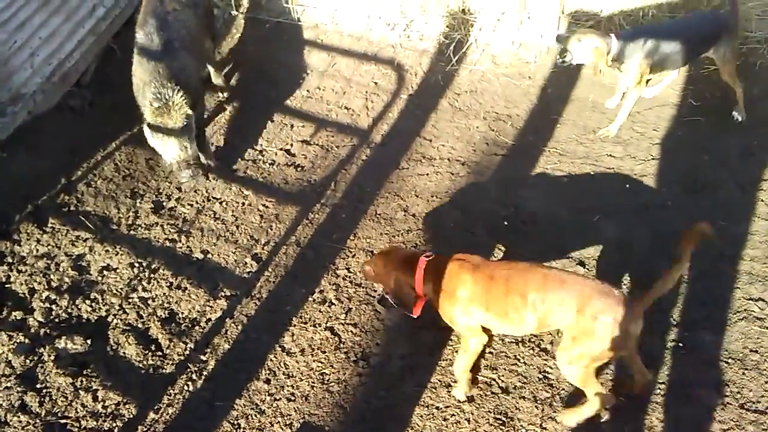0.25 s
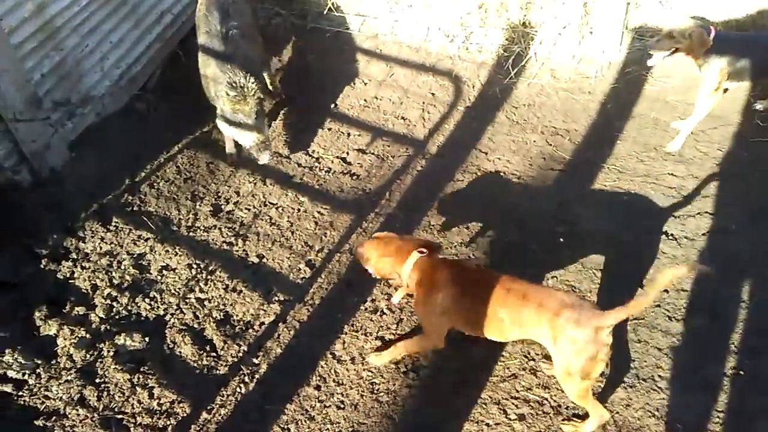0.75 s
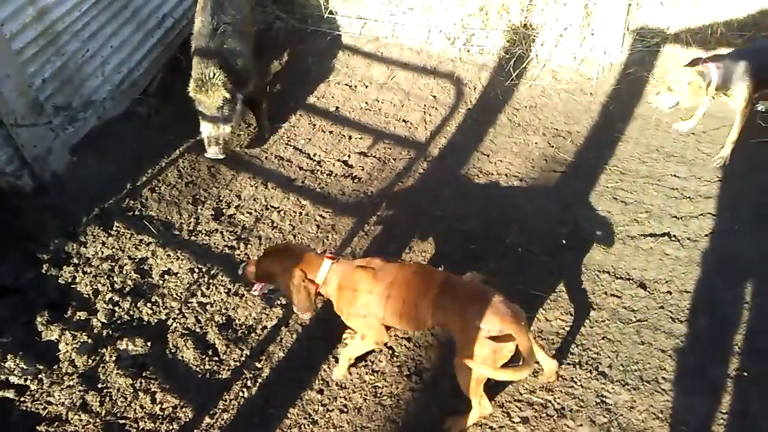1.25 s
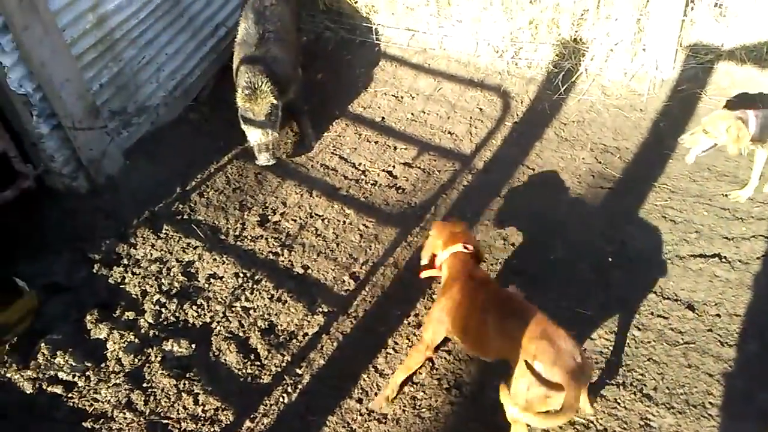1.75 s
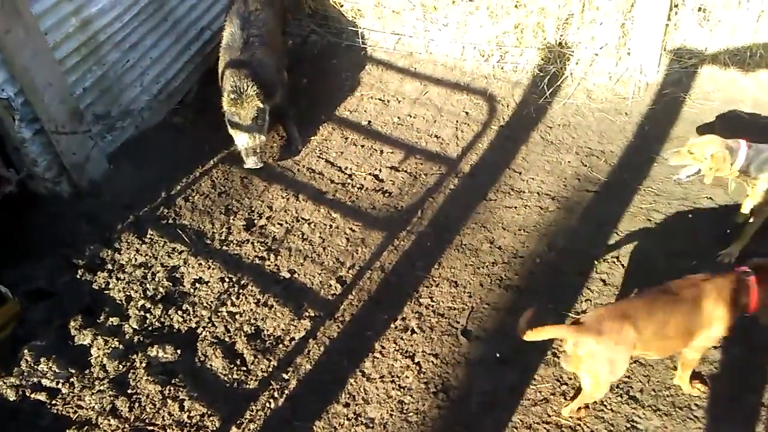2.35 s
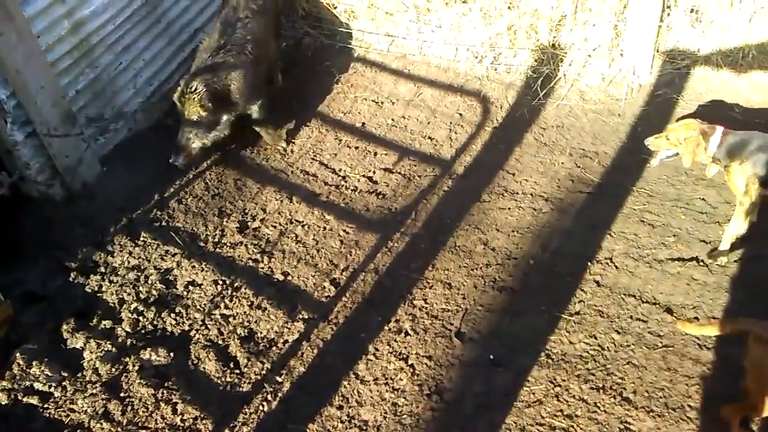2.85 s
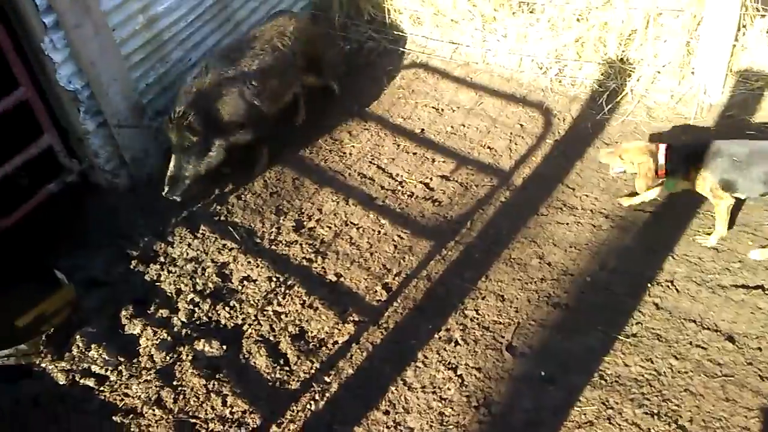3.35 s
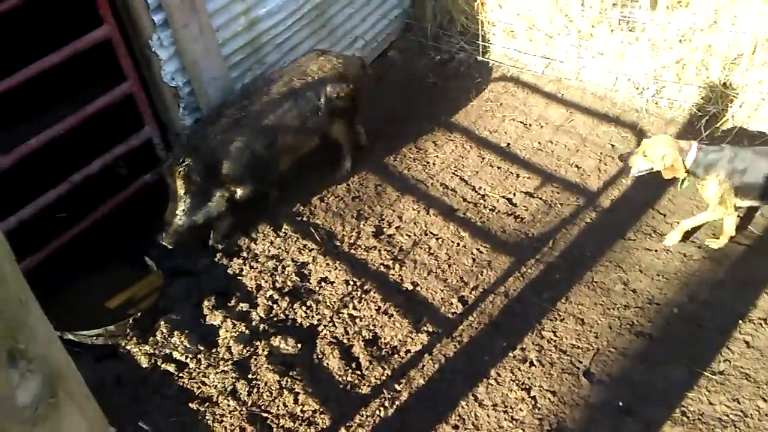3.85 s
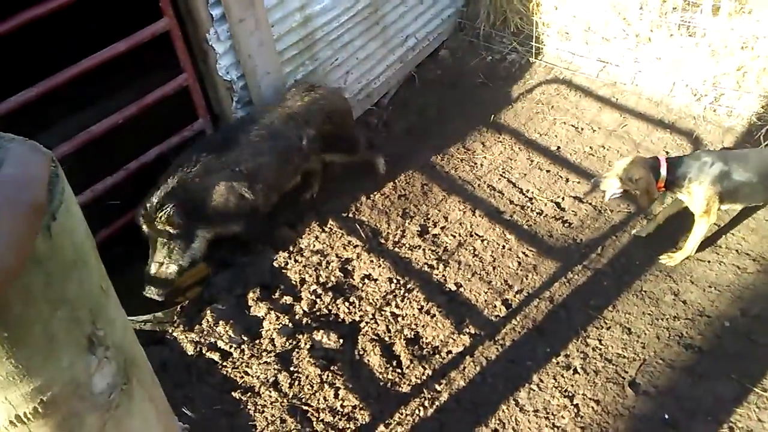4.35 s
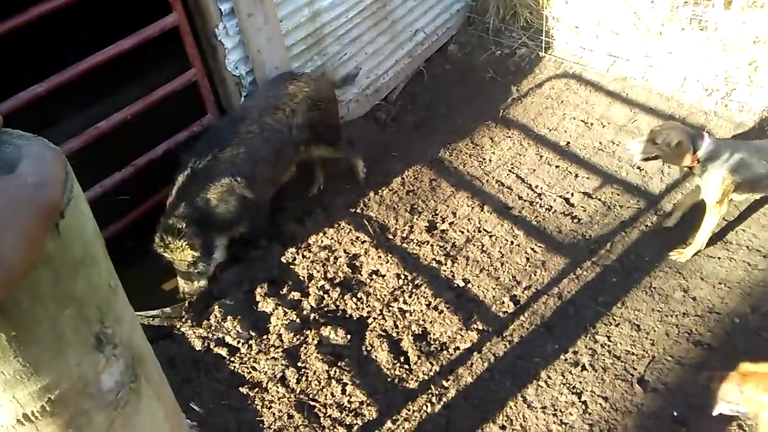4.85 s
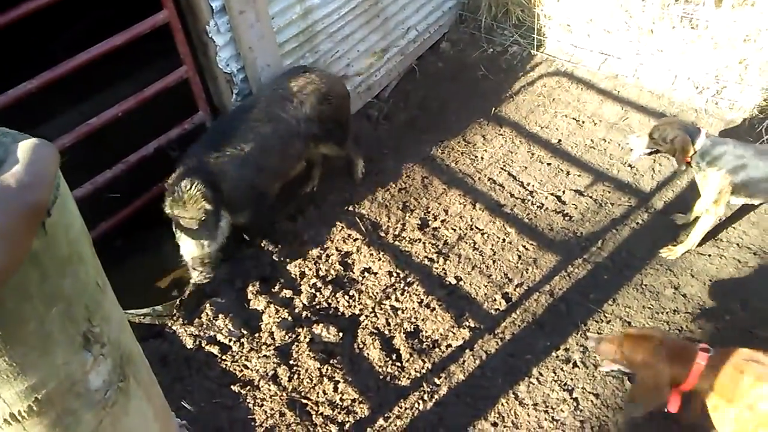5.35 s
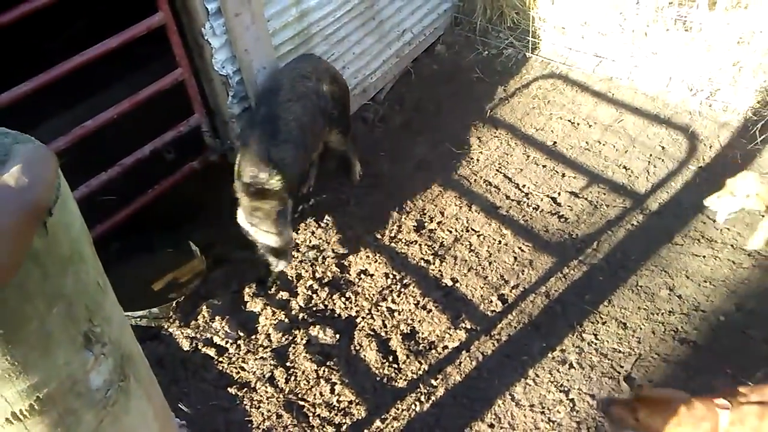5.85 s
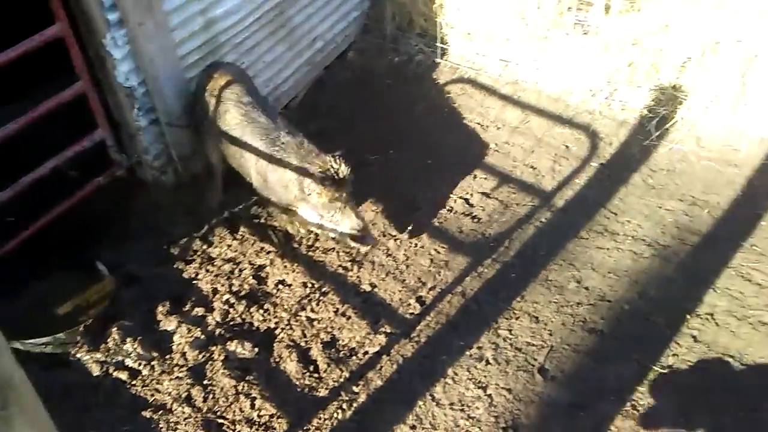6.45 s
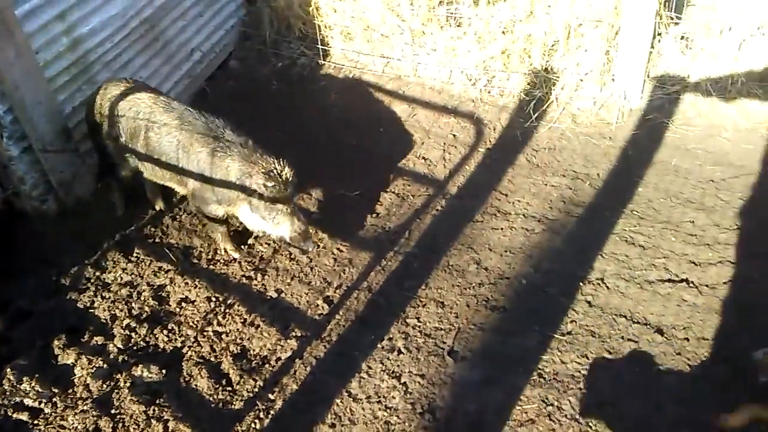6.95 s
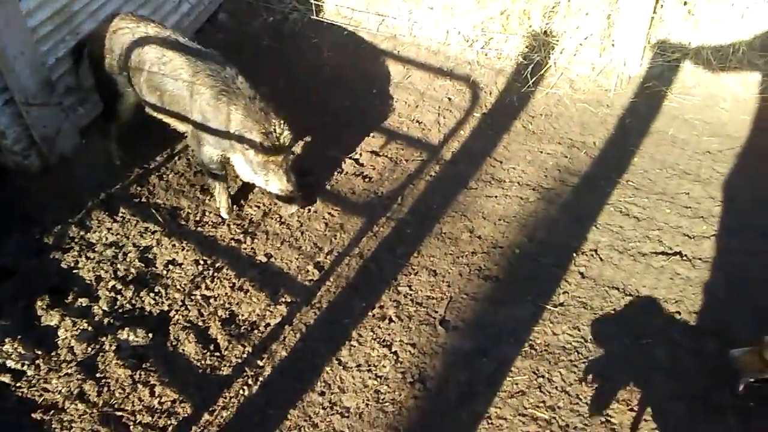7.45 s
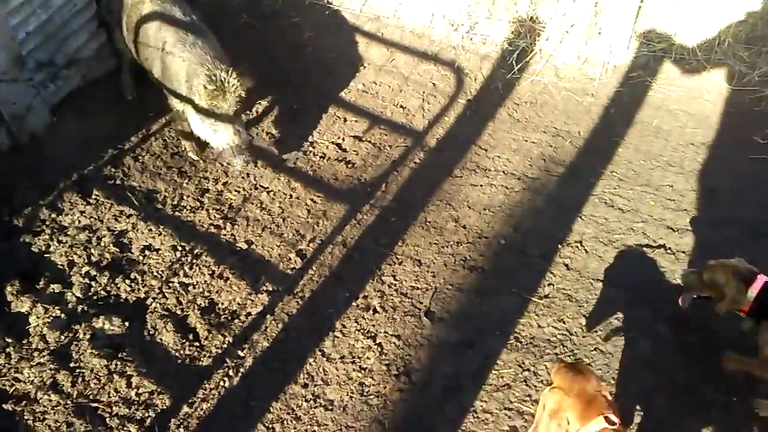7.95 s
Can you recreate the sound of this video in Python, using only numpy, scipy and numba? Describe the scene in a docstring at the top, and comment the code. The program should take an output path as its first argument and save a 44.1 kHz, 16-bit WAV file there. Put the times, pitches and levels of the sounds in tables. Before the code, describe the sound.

Two young hounds bark and bay in quick succession in a metal-walled dirt pen, with sharp rising whistle-like yips piercing through very close by.

```python
"""Young dogs baying in a metal-walled pen

Two dogs, one hoarse and one clear, bark a few metres away; their voices are wavering partials plus throaty rasp.
Others answer far off and an animal grunts. Close by, sharp near-sine whistles rise and turn breathy.
Behind them noise makes the shuffling paws, wind, hiss and airy whines; short filtered clicks make the knocks.
The walls echo, and the loudest sounds pull the gain down and clip."""
import sys
import numpy as np
from scipy import signal
from scipy.io import wavfile
from scipy.ndimage import uniform_filter1d, minimum_filter1d
from numba import njit

SR = 44100
rng = np.random.default_rng(int(sys.argv[2]) if len(sys.argv) > 2 else 0)


def master_out(mix):
    """Clip the mix to full scale and print it as 16-bit PCM to the path in sys.argv[1]."""
    frames = np.transpose(np.atleast_2d(mix))
    ceiling = np.clip(frames, -1, 1)
    pcm = np.round(ceiling * 32767).astype(np.int16)
    wavfile.write(sys.argv[1], SR, pcm)


N = 362497


def undb(db):
    """Turn decibels into a plain amplitude factor."""
    return 10 ** (np.asarray(db) / 20)


def unit(x):
    """Scale a sound so its average power is 1."""
    return x / np.sqrt(np.mean(x ** 2))


def noise(n):
    """White noise: equal strength at every pitch."""
    return rng.standard_normal(n)


def band(x, hz, width_hz):
    """Two-pole resonance, gain 1 at the centre."""
    b, a = signal.iirpeak(hz, hz / width_hz, SR)
    return signal.lfilter(b, a, x)


def walk(n, rate):
    """Random levels held for 1 / rate seconds, then smoothed twice so they glide."""
    hold = max(int(SR / rate), 40)
    steps = np.repeat(noise(n // hold + 1), hold)
    smooth = uniform_filter1d(uniform_filter1d(steps, hold), hold)
    return 1.3 * smooth[:n]


def read(rows):
    """Give the first sample, a short fade at both ends, and each column sample by sample."""
    s, *columns = np.transpose(rows)
    start = int(s[0] * SR)
    t = np.arange(start, min(int(s[-1] * SR), N)) / SR
    fade = np.clip(np.minimum(t - s[0], s[-1] - t) / 0.0022, 0, 1)
    return start, fade, [np.interp(t, s, c) for c in columns]


# a faint high hiss that swells now and then: t/s, level/dB
HISS_LEVELS = [(0.0, -58), (0.36, -61), (2.98, -65.5), (3.82, -64), (4.21, -59), (6.55, -57), (6.68, -55),
               (7.51, -55), (7.76, -46), (8.22, -57)]


def hiss():
    """Thin flickering noise high up, made by passing noise twice through one wide resonance."""
    db = read(HISS_LEVELS)[2][0]
    thin = band(band(noise(len(db)), 7800, 5400), 7800, 5400)
    return undb(db + 1.5 * walk(len(db), 30)) * unit(thin)


# thin airy whines in the background: start t/s, length t/s, centre f/Hz, top level/dB
AIRY_WHINES = [(1.267, 0.19, 3380, -34.5), (1.293, 0.21, 4200, -41), (2.2, .25, 2800, -49),
               (3.663, .06, 2700, -34), (4.551, .11, 2620, -33), (8.016, 0.14, 3390, -30.5)]
WHINE_ATTACK, WHINE_EDGE_DB = 0.37, 13  # share of the length spent swelling; how far the ends lie under the top


def whines():
    """Narrow noise that swells and fades: a steady sine shaken by a fast random walk."""
    out = np.zeros(N)
    for s, length, centre_hz, top_db in AIRY_WHINES:
        edge_db = top_db - WHINE_EDGE_DB
        start, fade, (hz, db) = read([(s, centre_hz, edge_db),
                                      (s + WHINE_ATTACK * length, centre_hz, top_db),
                                      (s + length, centre_hz, edge_db)])
        sine = np.sin(2 * np.pi * np.cumsum(hz) / SR)
        out[start:start + len(hz)] += fade * undb(db) * walk(len(hz), 900) * sine
    return out


# gusts on the microphone port, before flutter: t/s, level/dB
GUSTS = [(0.0, -71), (0.2, -34), (0.25, -50.5), (1.24, -38.5), (2.06, -57), (2.15, -38.5), (2.36, -62),
         (2.4, -36), (2.79, -66.5), (3.09, -47.5), (4.03, -40.5), (5.79, -43.5), (5.81, -46), (7.14, -45),
         (7.39, -59), (7.51, -36), (7.67, -50), (8.22, -44)]


def wind():
    """Low buffeting on the microphone port: deep noise with a slow and a faster flutter."""
    db = read(GUSTS)[2][0]
    rumble = band(band(noise(len(db)), 65, 90), 65, 150)
    flutter_db = 3 * walk(len(db), 15) + 4 * walk(len(db), 5)
    return undb(db + flutter_db) * unit(rumble)


# paws and bodies moving in the dirt: t/s, level/dB
PAW_LEVELS = [(0.0, -31), (0.43, -34.5), (0.68, -41), (1.3, -35), (1.74, -44), (2.31, -50), (2.65, -35),
              (2.86, -45), (3.23, -43), (3.65, -34), (3.89, -43), (4.4, -32), (5.01, -37), (5.43, -43),
              (5.72, -38.5), (6.68, -30), (7.6, -40), (8.22, -37)]
# tone colour of the dirt rustle, relative: f/Hz, level/dB per Hz
DIRT_COLOUR = [(88, -59), (150, -0.5), (562, -10), (623, -9), (680, -3.5), (1370, -4.5), (3270, -19),
               (5000, -57), (6500, -78), (11000, -120)]


def shuffle():
    """Half-octave bands of dirt rustle and yard murmur, each flickering on its own."""
    colour_hz, colour_db = np.transpose(DIRT_COLOUR)
    bands = np.zeros(N)
    for f in 170 * 2 ** np.arange(0, 5.1, .5):
        db = np.interp(np.log(f), np.log(colour_hz), colour_db) + 5.7 * walk(N, 9)
        bands += undb(db) * band(band(noise(N), f, f / 2), f, f / 2)
    level_db = read(PAW_LEVELS)[2][0]
    return undb(level_db) * unit(bands[:len(level_db)])


# dry knocks and ticks in the pen: t/s, level/dB before the ring dies away, f/Hz
KNOCK_HITS = [(1.886, -23.5, 2500), (4.49, -12, 900), (4.6, -33.5, 5870), (5.37, -30, 950),
              (6.308, -21, 1140), (7.429, -35, 1080), (8.0027, -36, 7100), (8.017, -43, 8360),
              (8.0411, -36, 8900), (8.132, -35, 7400)]


def knocks():
    """A click with a short ring: resonant noise that dies away within milliseconds."""
    out, t = np.zeros(N), np.arange(int(.04 * SR)) / SR
    for s, db, hz in KNOCK_HITS:
        start = int(s * SR)
        ring = unit(band(band(noise(len(t)), hz, 0.24 * hz), hz, 2.9 * hz))
        out[start:start + len(t)] += undb(db) * np.exp(-t / 0.003) * ring
    return out


# first reflections from ground and sheet-metal walls close to the dogs: delay t/s, level/dB
REFLECTIONS = [(.004, -23.5), (.011, -12), (.019, -14), (.031, -16), (.047, -21.5), (.068, -15.5)]


def early(x):
    """The direct sound plus delayed, weaker copies: its first reflections."""
    out = x.copy()
    for s, db in REFLECTIONS:
        lag = int(s * SR)
        out += undb(db) * np.r_[np.zeros(lag), x[:N - lag]]
    return out


@njit
def walls(x, lags, gain, damp):
    """Eight delay lines that feed each other, duller on every round."""
    line, soft, out = np.zeros((8, 8192)), np.zeros(8), np.zeros(len(x))
    for i in range(len(x)):
        total = 0.
        for k in range(8):
            soft[k] += (1 - damp) * (gain[k] * line[k, (i - lags[k]) & 8191] - soft[k])
            total += soft[k]
        out[i] = total
        for k in range(8):
            line[k, i & 8191] = x[i] + soft[k] - total / 4
    return out


PEN_T60_S, PEN_DAMP, PEN_DB = 1.1, 0.36, -34  # time to fall 60 dB before damping; treble damping; level


def pen_echoes(x):
    """Sound bounces between the pen walls and dies away."""
    lags = np.array([709, 947, 1213, 1499, 1811, 2143, 2503, 2897])  # samples
    gain = undb(-60 * lags / SR / PEN_T60_S)
    return undb(PEN_DB) * walls(x + 1e-18, lags, gain, PEN_DAMP)


ECHO_S, ECHO_DB = 0.23, -30


def distant_echo(x):
    """A distant wall sends each call back once, dull."""
    lag = int(ECHO_S * SR)
    late = np.r_[np.zeros(lag), x[:-lag]]
    return undb(ECHO_DB) * band(band(late, 1500, 1600), 1200, 2400)


def arches(table, mouth, count, swell_db, ease, odd_db, first_db, early_share, closing_db, clear_db):
    """Each call climbs, holds and falls in pitch; the mouth colours its partials.
    Odd partials and rasp shift in level during the hold; the fundamental starts early and lasts longest."""
    calls, (mouth_hz, mouth_db) = [], np.transpose(mouth)
    for s, rise, hold, fall, hz0, hz1, hz2, hz3, db1, db2, db3, rasp_db, *own in table:
        bend, third_db, fourth_db = own or (1, 0, 0)
        corners = np.cumsum([0, max(rise, .004), max(hold, .002), max(fall, .002)])
        t = np.arange(0, corners[-1], .001)
        up = np.minimum(t / corners[1], 1)
        climb_hz = hz0 * (hz1 / hz0) ** up ** max(bend, .5)
        hz = np.where(up < 1, climb_hz, np.interp(t, corners[1:], [hz1, hz2, hz3]))
        hz = uniform_filter1d(hz, size=9, mode="nearest")
        swell = swell_db * (1 - up) ** max(ease, .5)
        db = np.interp(t, corners[1:], [db1, db2, db3]) - swell
        held = np.interp(t, corners, [0, 1, 1, 0]) ** 3
        # as the mouth closes, higher partials change more
        closing = closing_db * np.interp(t, corners[2:], [0, 1])
        source_db = [(odd_db + first_db) * held + early_share * swell,
                     closing,
                     odd_db * held + third_db + 2 * closing,
                     fourth_db + 3 * closing]
        partials = []
        for k in range(count):
            colour_db = np.interp(np.log((k + 1) * hz), np.log(mouth_hz), mouth_db)
            partials.append(db + source_db[k] + colour_db)
        air_db = db + rasp_db + clear_db * held
        calls.append(np.transpose([s + t, hz, *partials, air_db]))
    return calls


# resonances of the throat: f/Hz, width f/Hz, level/dB
THROAT_RESONANCES = [(633, 357, 6.5), (900, 734, 3), (1650, 510, 7), (2084, 340, 4.5), (2880, 650, -16.5),
                     (4560, 3430, -17)]


def voices(calls, count, jitter, shimmer_db, gate, rasp_db, bright_db):
    """Vocal folds give wavering partials; turbulent air puffs unevenly once a cycle through the throat."""
    out = np.zeros(N)
    for rows in calls:
        start, fade, (hz, *db, air_db) = read(rows)
        n = len(hz)
        # the more turbulent the air, the more it shakes the folds
        rough = np.clip((air_db - np.max(db, axis=0) + 23) / 12, .2, 1.5)
        cycle = np.cumsum(hz * (1 + jitter * rough * walk(n, 120))) / SR
        tone = np.zeros(n)
        for k in range(count):
            level = undb(db[k] + shimmer_db * rough * walk(n, 107.3))
            tone += level * np.sqrt(2) * np.sin(2 * np.pi * (k + 1) * cycle)
        # every second partial above the last listed one, falling away from it
        for k in range(1, 5):
            tone += undb(db[-1] - 10.0 * k) * np.sin(2 * np.pi * (count + 2 * k) * cycle)
        size = undb(4.9 * noise(n))[cycle.astype(int)]  # one random size per cycle
        puffs = size * np.exp(-(cycle % 1) / gate) * noise(n)
        rasp = np.zeros(n)
        for k, (f, width, g) in enumerate(THROAT_RESONANCES):
            rasp += (-1) ** k * undb(g) * band(band(puffs, f, width), f, 2 * width)
        # bright broadband crackle in bursts over the rasp, as from overloaded loud barks
        bright = np.diff(puffs * size, prepend=0) * undb(5 * walk(n, 60))
        rough_part = unit(rasp) + undb(bright_db) * unit(bright)
        out[start:start + n] += fade * (tone + undb(air_db + rasp_db) * rough_part)
    return out


# far barks: start t/s, rise t/s, hold t/s, fall t/s, then f/Hz at start, top, end of hold, end,
# then level/dB at top, end of hold, end (before the mouth's colour), rasp level/dB relative to these
FAR_CALLS = [ (1.01, 0.015, 0.043, 0.065, 560, 582, 611, 620, -28.5, -32, -48, -11),
             (2.09, 0.043, 0.041, .05, 513, 589.3, 597, 606, -28, -30, -54.5, -13.5),
             (4.33, .028, 0.022, 0.1, 714, 700, 689, 742, -34, -26.5, -47, -14.5),
             (5.09, 0.072, 0.049, 0.039, 415, 604.5, 598, 600, -29.5, -33.5, -50, -12.5),
             (5.93, 0.032, 0.0091, 0.035, 569, 601, 584, 556, -36, -32, -46, -18),
             (7.41, .056, 0.045, 0.039, 622, 618, 520, 554, -28, -37, -40, -19),
             (7.78, 0.05, 0.0046, 0.031, 605, 674, 675, 680, -30.5, -34, -55, -20),
             (8.06, 0.072, 0.0075, 0.067, 554, 614, 626, 640, -23.5, -31.5, -60, -6)]
# how the far mouths colour the partials: f/Hz, level/dB
FAR_COLOUR = [(400, -6), (600, -1.5), (1200, -3), (1800, -6.5), (2200, -21)]


def far_barks():
    """Other dogs answer far off: the same kind of voice, with three listed partials."""
    calls = arches(FAR_CALLS, FAR_COLOUR, count=3, swell_db=23, ease=0.91, odd_db=-.1, first_db=1.5,
                   early_share=.1, closing_db=-3, clear_db=-1.5)
    return early(voices(calls, count=3, jitter=.015, shimmer_db=4., gate=.3, rasp_db=-3, bright_db=-50))


# low grunts: same columns as the far barks
GRUNT_CALLS = [ (0.085, 0.037, 0.02, 0.068, 247.3, 268, 230, 87, -27.5, -25.5, -41, -1),
               (2.07, 0.037, 0.032, 0.089, 166, 221.6, 135, 94, -31.5, -31.5, -50, 1.5),
               (4.5, 0.1, 0.033, 0.045, 146, 194, 115.7, 93, -33, -32, -40, 5),
               (5.27, 0.026, 0.032, 0.088, 111.8, 99.7, 99, 101.4, -33.5, -35.5, -55, 3.5),
               (7.46, 0.047, 0.023, 0.033, 114.4, 91.4, 85, 84, -34, -38, -46, -8)]
# how the grunting mouth colours the partials: f/Hz, level/dB
GRUNT_COLOUR = [(90, -1), (200, -2.5), (300, -19.5), (500, -11), (800, -3.5)]


def low_grunts():
    """An animal grunts: low, shaky partials with long puffs of air."""
    calls = arches(GRUNT_CALLS, GRUNT_COLOUR, count=3, swell_db=21.5, ease=0.89, odd_db=5, first_db=1.5,
                   early_share=.3, closing_db=-6, clear_db=-1.5)
    return voices(calls, count=3, jitter=.03, shimmer_db=2.5, gate=.7, rasp_db=1.5, bright_db=-42)


# rising whistles, levels before the closeness boost: start t/s, false start's lead t/s, its top f/Hz,
# its level/dB, start f/Hz, swell t/s, f/Hz after it, tone level/dB, fade t/s, f/Hz after it, air level/dB
WHISTLE_TABLE = [ (0.256, 0.023, 3170, -14, 2630, .035, 3400, 4, .045, 4400, -31.5),
                 (0.641, 0.018, 3200, -11, 2900, .016, 3280, 2, .045, 4400, -31),
                 (0.977, .017, 3220, -10.5, 2970, 0.023, 3450, 1, .034, 4600, -31.5),
                 (6.068, .03, 2970, -20, 2500, 0.039, 3570, -1.5, 0.026, 4220, -33),
                 (6.476, 0.018, 2860, -14, 2590, 0.037, 3640, 1, 0.027, 4230, -35.5),
                 (6.833, 0.015, 2780, -21, 2410, 0.019, 3010, 2.5, 0.059, 4490, -36),
                 (7.201, 0.015, 3000, -20, 2660, 0.029, 3300, 1, 0.045, 4680, -34),
                 (7.549, 0.02, 2990, -13, 2680, 0.029, 3255, 1.5, 0.041, 4400, -32.5),
                 (7.883, 0.019, 2870, -12.5, 2660, 0.039, 3880, 0, 0.021, 4500, -32)]
# false start: share of its top pitch at its start, swell, break, air
LEAD_FROM, LEAD_SWELL_DB, LEAD_BREAK_S, LEAD_AIR_DB = .88, 31, 0.0037, -47
WHISTLE_SWELL_DB, WHISTLE_FADE_DB = 9, 32
FADE_BY_HALF = .3  # share of the fade reached halfway through it
TAIL_S, TAIL_CLIMB, TAIL_DB = .04, 1.06, 34  # length, pitch factor, drop


def glides():
    """Each whistle: a short false start that breaks, then a climb that swells, fades and trails off."""
    calls = []
    for s, lead, lead_hz, lead_db, hz0, swell, hz1, db, fade, hz2, air_db in WHISTLE_TABLE:
        calls.append([(s - lead, LEAD_FROM * lead_hz, lead_db - LEAD_SWELL_DB, LEAD_AIR_DB - 20.5),
                      (s - LEAD_BREAK_S, lead_hz, lead_db, LEAD_AIR_DB),
                      (s, .93 * lead_hz, lead_db - 3.5, LEAD_AIR_DB - 0.5)])
        top, faded_db = s + swell, db - WHISTLE_FADE_DB
        calls.append([(s, hz0, db - WHISTLE_SWELL_DB, air_db - 7),
                      (top, hz1, db, air_db),
                      (top + fade / 2, (hz1 + hz2) / 2, db - FADE_BY_HALF * WHISTLE_FADE_DB, air_db),
                      (top + fade, hz2, faded_db, air_db - 5.5),
                      (top + fade + TAIL_S, TAIL_CLIMB * hz2, faded_db - TAIL_DB, air_db - 13.5)])
    return calls


def whistles():
    """A near sine that flutters and breaks into breathy noise at the top of its rise; air hisses above."""
    out = np.zeros(N)
    for rows in glides():
        start, fade, (hz, tone_db, air_db) = read(rows)
        n = len(hz)
        wave = np.sin(2 * np.pi * np.cumsum(hz * (1 + 0.016 * walk(n, 250))) / SR)
        breathy = np.clip((hz - 3700) / 700, .08, 1)
        breath = 1 - breathy + breathy * walk(n, 900)
        tone = undb(tone_db + 2. * walk(n, 160)) * np.sqrt(2) * wave * breath
        dying = np.clip(np.arange(n, 0, -1) / (0.31 * n), 0, 1)  # the air runs out gradually
        air = np.zeros(n)
        for f, width, g in ((3330, 1830, 9.5), (6040, 800, -3.5), (9100, 1300, -13.5)):
            air += undb(g) * band(band(noise(n), f, width), f, width)
        air_level = undb(air_db + 6.5 + 4.6 * walk(n, 162))
        out[start:start + n] += fade * (tone + air_level * dying * unit(air))
    return undb(7.0) * out  # far closer to the microphone than the dogs


# first part of the hoarse dog's bark: the far barks' columns, then bend of the climb (1 = even),
# extra third partial level/dB, extra fourth partial level/dB
BARK_OPENINGS = [ (0.31, .075, .006, .006, 220.2, 467.4, 460, 447, -9, -11, -13, -6, 1.05, 12, .5),
                 (0.395, .006, .048, .008, 399, 385, 296, 304, -14, -7, -11, -6, .95, 3, -3),
                 (1.14, 0.058, 0.0053, 0.0051, 237.4, 524, 537, 550, -13, -12, -12, -3, .9, 12, 3),
                 (2.46, 0.073, 0.025, .03, 155.9, 405.6, 428, 265, -9.5, -4.5, -18, -8, .95, -3, .1),
                 (3.05, 0.044, 0.037, 0.036, 199.1, 417.3, 430.2, 261, -9.5, -7.5, -18, -7, .9, -6, .1),
                 (3.47, 0.051, 0.0094, 0.032, 186.9, 416.3, 411, 354, -10, -12, -16, -7, .85, 3, -8),
                 (4.09, .034, 0.027, 0.017, 250, 397, 406, 378, -10.5, -18, -20, -7, .95, -6, .1),
                 (4.72, .055, 0.017, .04, 174.8, 386.2, 401.8, 360, -11, -6, -14, -8, .9, .1, .1),
                 (5.515, 0.082, 0.027, 0.041, 173, 309.8, 366.7, 323, -13, -13.5, -12.5, -3, .9, 3, .1),
                 (6.615, 0.0098, .058, 0.023, 394, 378.5, 319.7, 353, -20, -12.5, -16, -4, .95, -3, .1)]
# the rest of the bark, a row for each jump of the voice: same columns
BARK_CLOSINGS = [ (0.45, .016, 0.038, .05, 467, 485, 401, 345, -9.5, -13, -32, -10, .95, -3, 10),
                 (1.21, 0.023, 0.065, 0.035, 537, 570.5, 486, 255, -8, -13, -24, -6, .95, 6, 10),
                 (2.568, .008, .01, .008, 545, 575, 560, 510, -12, -13, -18, -12, .95, .1, .1),
                 (2.588, .03, .022, .06, 486, 521.3, 495, 189.6, -6, -7.5, -28, -17.5, .95, .1, .1),
                 (3.13, 0.021, .02, .03, 530, 543.5, 526, 485, -10, -9, -8, -17, .95, .1, -6),
                 (3.2, .006, .02, .034, 533, 525, 452, 203, -9.5, -15, -26, -14, .95, -3, .1),
                 (3.5, 0.019, .03, .006, 561, 583.6, 545, 545, -15, -11, -11, -8, .95, 6, .1),
                 (3.55, .022, .004, .012, 545, 584, 580, 516, -13, -13, -8, -8, .95, 3, .1),
                 (3.585, .004, .026, .065, 487, 480, 434.8, 173, -9, -10.5, -29, -18, .95, .1, .1),
                 (4.145, 0.03, .004, .012, 502, 580, 575, 515, -8, -8, -18, -11, .95, 8, 3),
                 (4.195, .02, .024, 0.058, 489, 526, 475, 233, -11, -10, -26, -17, .95, -3, -3),
                 (4.82, .022, .04, .008, 558, 470, 452, 421, -8, -5, -18, -18, .95, -6, -6),
                 (4.89, .004, .01, .036, 417, 405, 372, 183, -11, -18, -30, -8, .95, 6, 6),
                 (5.645, .026, .022, 0.014, 486.4, 568.6, 502, 486, -11, -10.5, -11, -6, .95, 3, .1),
                 (5.71, 0.014, 0.032, 0.043, 529, 551, 463.6, 484, -6.5, -13, -22.5, -14, .95, -3, .1),
                 (6.625, 0.043, 0.023, .01, 391.6, 537, 516, 488, -16, -23, -10, -12, .8, 8, 3),
                 (6.695, 0.024, 0.026, 0.04, 461, 536.5, 388, 284, -4, -15, -29, -15.5, .95, -6, -3)]
# the clear-voiced dog's bays, a row for each jump of the voice: same columns
CLEAR_BAYS = [ (0.675, .024, .004, .022, 176.6, 304, 320, 480, -8, -10, -30, -22, .95, -15, -10),
              (0.728, .02, .028, .044, 597, 694, 640, 428, -13, -7, -15, -6, .8, 6, 3),
              (1.53, .105, .078, .024, 160, 556, 598.2, 456, -10, -10, -14, -7, 1.7, 9, -2),
              (1.735, .004, .018, .02, 456, 456, 465, 470, -16, -16, -26, -7, .95, 18, .1),
              (3.73, 0.068, .096, 0.033, 178.1, 579.8, 608.3, 283, -9.5, -7, -17, -9, 1.05, 3, 3),
              (6.05, 0.054, 0.082, 0.052, 146.8, 557.4, 580, 400, -13.5, -7, -16, -10, .9, -3, -3),
              (6.515, 0.036, .058, 0.043, 378, 575, 584, 369, -7, -10, -23, -16, .8, .1, .1),
              (6.975, 0.058, 0.075, 0.045, 158.1, 560.5, 558, 390, -6, -8.5, -14, -12, .85, -3, .1)]
# how each mouth colours the partials: f/Hz, level/dB
OPENING_COLOUR = [(150, -18.5), (300, -20), (450, -23), (620, -6), (830, 0.5), (1150, -7), (1650, -2),
                  (2300, -19)]
CLOSING_COLOUR = [(170, -8), (300, -6), (450, -6), (700, -5.5), (950, 2), (1150, -3.5), (1600, -18),
                  (2300, -40)]
BAY_COLOUR = [(150, -11), (300, -6.5), (450, -5), (580, -2), (800, -5.5), (1150, -6.5), (1700, -28),
              (2400, -30.5)]


def near_dogs():
    """A hoarse and a clear young dog: four listed partials and more above, throaty rasp, bright overload edge."""
    openings = arches(BARK_OPENINGS, OPENING_COLOUR, count=4, swell_db=42, ease=2.37, odd_db=-9.5,
                      first_db=-6, early_share=.6, closing_db=-3, clear_db=-3)
    closings = arches(BARK_CLOSINGS, CLOSING_COLOUR, count=4, swell_db=8, ease=0.69, odd_db=-13.5,
                      first_db=-8, early_share=.1, closing_db=-6, clear_db=-5)
    bays = arches(CLEAR_BAYS, BAY_COLOUR, count=4, swell_db=42, ease=1.3, odd_db=-6,
                  first_db=6, early_share=.35, closing_db=-2.5, clear_db=-9)
    return early(voices(openings + closings + bays, count=4, jitter=.018, shimmer_db=3.4, gate=.3,
                        rasp_db=2., bright_db=-25))


def scene():
    """Add the background, the calls and the echoes they raise."""
    far, grunts, lips, near = far_barks(), low_grunts(), whistles(), near_dogs()
    # far dogs excite the echoes more, the close whistle less
    into = near + undb(8.0) * far + grunts + undb(-18.0) * lips + knocks()
    out = near + far + grunts + lips + knocks() + pen_echoes(into) + distant_echo(into)
    for steady in (hiss(), whines(), wind(), shuffle()):
        out[:len(steady)] += steady
    return out[None]


TOP_HZ = 15850


def record(dry):
    """A look-ahead limiter ducks everything under loud calls, the sharpest peaks clip, the top is cut."""
    span = int(.006 * SR)
    peak = uniform_filter1d(-minimum_filter1d(-np.abs(dry), span), span)
    held = dry * np.minimum(1, 1 / (peak + 1e-9)) ** .85
    # the housing weakens two narrow bands
    held = held - .8 * band(held, 3500, 220) - .6 * band(held, 5200, 500)
    hard = 14  # sharpness of the clipping corner
    clipped = held / (1 + np.abs(held / .88) ** hard) ** (1 / hard)
    low_pass = signal.ellip(10, .2, 75, TOP_HZ, fs=SR, output="sos")
    return signal.sosfilt(low_pass, clipped)


dry = scene()
out = record(dry)
master_out(out)
```